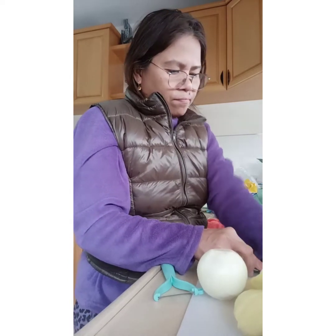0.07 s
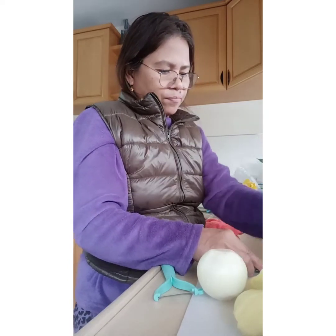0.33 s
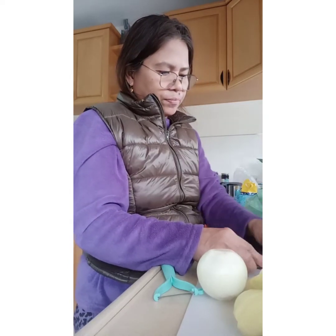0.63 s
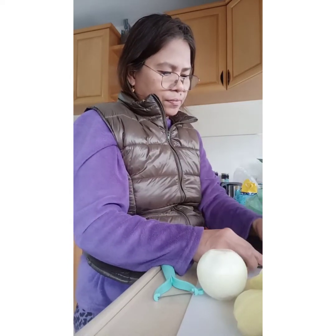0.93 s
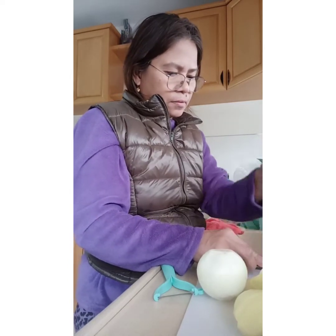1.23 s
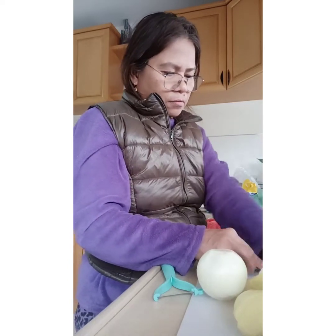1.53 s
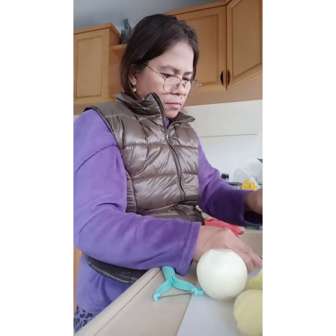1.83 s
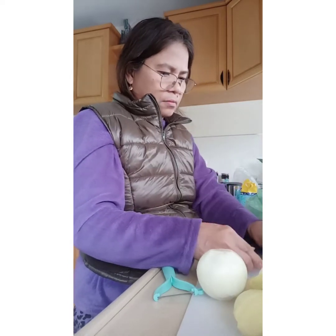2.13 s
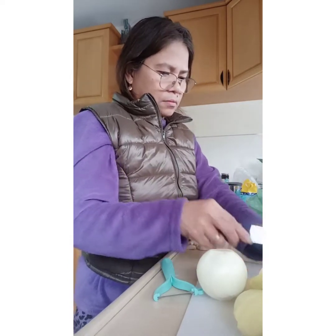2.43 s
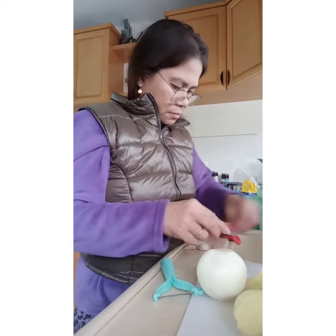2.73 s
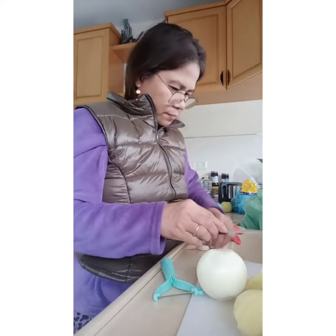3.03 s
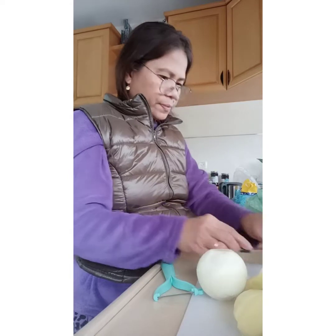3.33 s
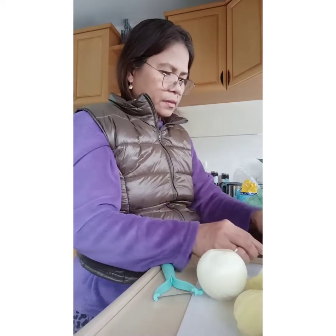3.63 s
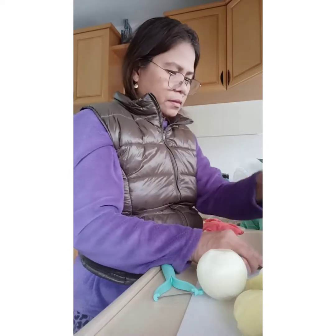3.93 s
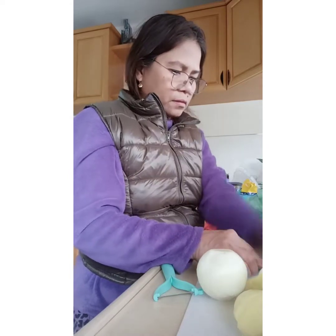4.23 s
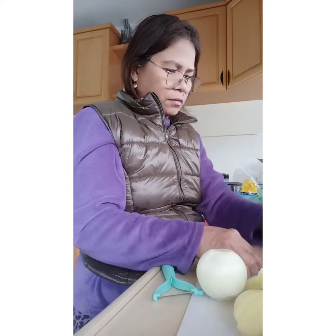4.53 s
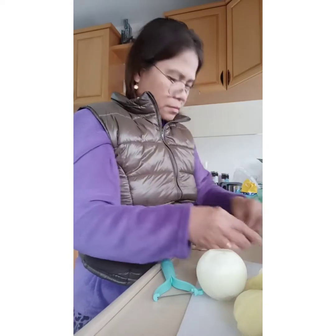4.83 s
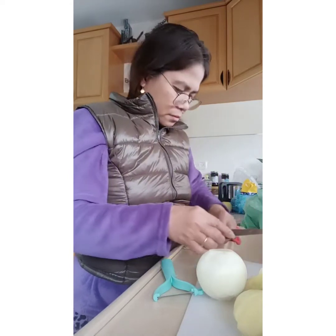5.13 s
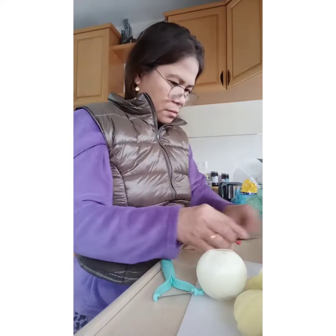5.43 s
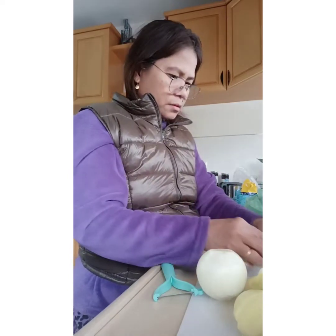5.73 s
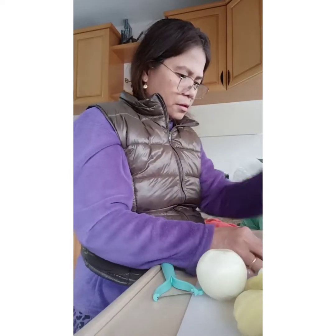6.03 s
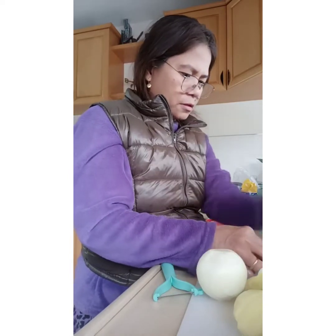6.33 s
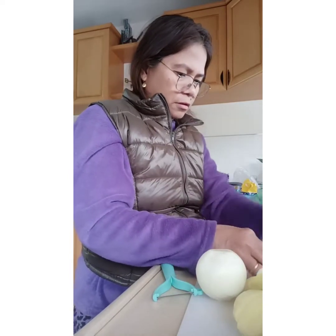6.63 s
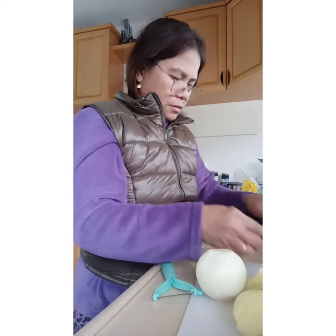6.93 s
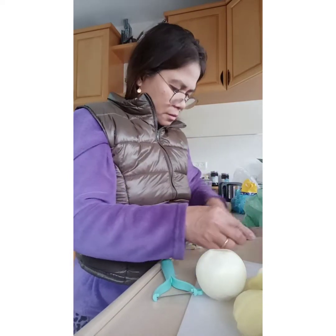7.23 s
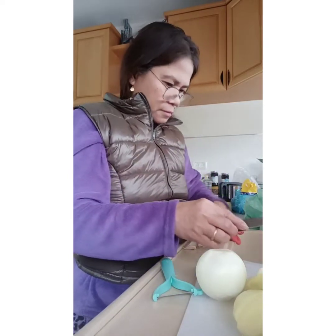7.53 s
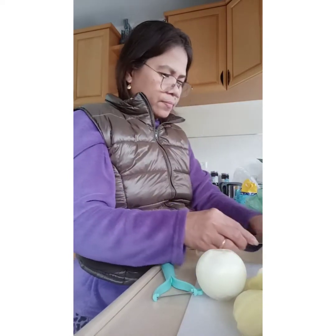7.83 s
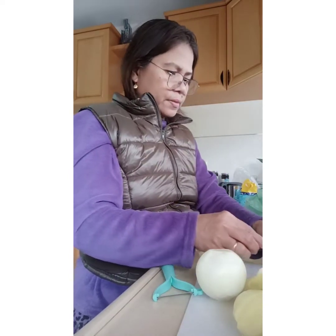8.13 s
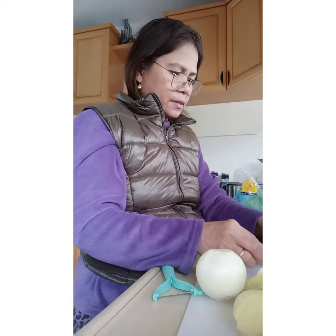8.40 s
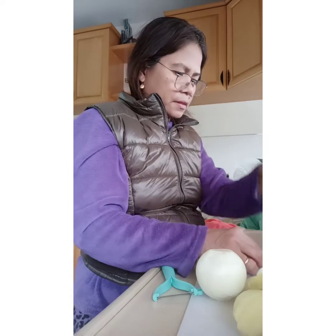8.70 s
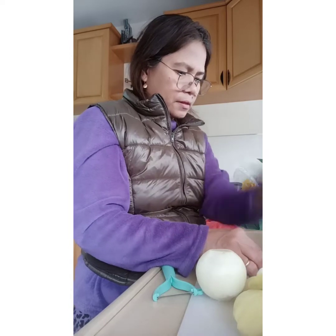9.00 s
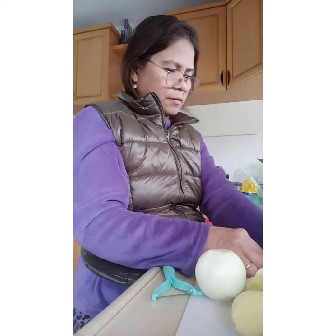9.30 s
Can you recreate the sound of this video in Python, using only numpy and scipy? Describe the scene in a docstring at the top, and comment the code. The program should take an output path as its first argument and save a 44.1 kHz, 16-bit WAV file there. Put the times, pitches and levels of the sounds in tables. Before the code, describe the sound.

In a small, hard-walled kitchen, a fridge and a fan hum faintly while papery onion skin is cut and stripped off near the microphone. Light crinkles come first, then a sharp snap and several rustling pulls. A stronger bout of tearing follows, then a run of small ticks and rips, and a last crack and pull. Occasional muffled bumps on the counter accompany the quiet, close peeling.

```python
"""Peeling papery vegetable skin

Dry, papery skin is cut and pulled off at a kitchen counter, close to a phone. It fails by brittle
fracture: each pull is a swarm of tiny breaks that swells and dies away. Between pulls come short rips,
snapping flakes, light fingering and soft knocks. A small hard room reflects them, and two appliance
motors hum underneath, with steady air noise and a brief low drone."""
import sys
import numpy as np
from scipy import signal
from scipy.fft import rfft, irfft
from scipy.io import wavfile
from scipy.ndimage import uniform_filter1d

SR = 44100
rng = np.random.default_rng(int(sys.argv[2]) if len(sys.argv) > 2 else 0)


def generate_wav(signal):
    """Clip the signal to [-1, 1] and save it as 16-bit WAV at the path in sys.argv[1]."""
    frames = np.transpose(np.atleast_2d(signal))
    scaled = np.clip(frames, -1, 1) * 32767
    pcm = np.round(scaled).astype(np.int16)
    wavfile.write(sys.argv[1], SR, pcm)


N = 421596
T, FREQ = np.arange(N) / SR, np.arange(N // 2 + 1) * SR / N


def pulls(gain_db=-4):
    """Incoherent addition: overlapping pulls sum in power, and the strongest sets the timbre."""
    # strips dragged off: peak_s, level_db, swell_s, fade_s, body_db, treble_db, sheet_hz
    strips = [(0.661, -43, 0.026, 0.037, -19.5, -1.5, 4500), (0.744, -46, 0.038, 0.04, -14, -1.9, 3550),
              (0.991, -48.5, 0.018, 0.021, -22, -4.5, 5350), (1.3, -61.5, 0.024, .03, -20, -1, 5700),
              (1.45, -56.5, 0.018, .02, -13, 0, 6050), (1.52, -59, 0.033, 0.018, -27, -2, 5660),
              (2.148, -46.5, 0.02, 0.031, -16.5, -2.5, 3630), (2.29, -44.5, 0.025, 0.029, -16, -2, 5000),
              (2.41, -46, 0.034, 0.039, -11.5, -3, 5130), (2.515, -52, 0.041, 0.035, -16, -2.5, 4600),
              (4.095, -58.5, 0.033, .012, -17, -4, 4030), (4.195, -53.5, 0.022, 0.017, -17, -2, 5400),
              (4.286, -41, 0.027, 0.032, -20.5, -2, 3950), (4.42, -48, .02, 0.024, -12, -2.3, 5300),
              (4.489, -41, 0.031, 0.025, -16, -1.6, 5670), (4.62, -58, 0.035, 0.032, -22, -2.5, 5540),
              (5.675, -53.5, 0.033, 0.032, -22, -3.5, 4300), (5.838, -38, 0.022, 0.025, -22.5, -1.3, 4500),
              (6.02, -41, 0.033, 0.031, -17.5, -0.5, 4430), (6.135, -40, 0.044, 0.037, -18, -3, 4850),
              (6.18, -40.5, 0.024, 0.033, -16, -3.5, 3880), (6.268, -39, 0.014, 0.0067, -14, -2, 5110),
              (8.715, -45, 0.028, .022, -25, -1, 2820), (8.76, -46, .007, 0.013, -17, -2, 2760),
              (8.835, -40.5, 0.019, 0.023, -14, -2, 4640), (8.99, -54, 0.024, 0.025, -16, -1, 5260)]
    strips, t = np.array(strips), T[::64]
    powers = np.array([undb(db) ** 2 * swell(t - peak_s, swell_s, fade_s)
                       for peak_s, db, swell_s, fade_s in strips[:, :4]])
    total = powers.sum(axis=0)
    body_db, treble_db, sheet_hz = (np.interp(T, t, column @ powers / total) for column in strips.T[4:])
    skin = rustle(per_s=3200, spread_db=6.5, catch_db=1.5, body_db=body_db, treble_db=treble_db,
                  sheet_hz=sheet_hz, ring_db=7)
    return undb(gain_db) * np.sqrt(np.interp(T, t, total)) * skin


def swell(t, swell_s, fade_s):
    """Power envelope of a pull: exponential growth and decay, rounded off at t = 0."""
    from_peak = np.maximum(-t / swell_s, t / fade_s)
    return 1 / np.cosh(np.minimum(from_peak, 20)) ** 2


def rustle(per_s, spread_db, catch_db, body_db, treble_db, sheet_hz, ring_db):
    """Stick-slip excitation: fractures catch and let go, driving the sheet and the vegetable under it."""
    # spectrum of the skin: frequency_hz, density_db
    skin_spectrum = [(880, -42), (1500, 2), (1670, 3.5), (2350, 2.5), (3610, 3.5), (4850, -1.5), (7600, 0),
                     (11000, -9), (15500, -6.5)]
    # spectrum of the vegetable: frequency_hz, density_db
    body_spectrum = [(150, -1), (300, 7), (550, 3.5), (900, 7), (1400, 5.5), (2200, -23.5)]
    swarm = fractures(per_s, spread_db) * undb(catch_db * walk(90))
    treble = undb(np.minimum(treble_db, -0.7))
    colour = undb(across(skin_spectrum)) / np.sqrt(1 + (1900 / (FREQ + 1)) ** 8)
    fine_share = 1 / (1 + (7000 / (FREQ + 1)) ** 10)  # the finest flakes make the treble
    coarse = unit(shape(swarm, colour * np.sqrt(1 - fine_share)))
    # the sheet's pitch slides as it bends: crossfade resonators a third of an octave apart
    pitch_octaves = np.log2(sheet_hz) + 0.39 * walk(44)
    ring = sum(band(coarse, hz, q=3) * np.maximum(1 - 3 * np.abs(pitch_octaves - np.log2(hz)), 0)
               for hz in 2000 * 2 ** (np.arange(7) / 3))
    crinkle = unit(coarse + undb(ring_db) * ring) * np.sqrt(1 - treble ** 2)
    fizz = unit(shape(swarm, colour * np.sqrt(fine_share))) * treble
    rub = unit(shape(swarm, undb(across(body_spectrum)))) * undb(np.minimum(body_db, 0))
    return crinkle + fizz + rub


def fractures(per_s, spread_db, size=N):
    """Poisson process: tiny breaks come at random moments, a few much larger than the rest."""
    breaks = rng.random(size) < per_s / SR
    polarity = rng.choice([-1, 1], size)
    strength = undb(spread_db * np.clip(rng.standard_normal(size), -2, 2))
    return unit(breaks * polarity * strength + 1e-9)


def snaps(crackle_s=0.01, gain_db=-2.5):
    """Brittle fracture: a flake breaks with one impulse, and the crack runs on for a moment."""
    # snapping flakes: start_s, level_db, pitch_hz, q
    breaks = [(0.067, -38.5, 7700, 1), (0.911, -31, 6500, 1.4), (1.109, -39, 7500, .9),
              (1.317, -29.5, 8750, 1.6), (2.2621, -18.5, 2700, 0.7), (2.2783, -21, 5200, 1.6),
              (3.376, -39, 9900, 0.87), (5.365, -43.5, 13000, 0.6), (5.829, -21.5, 5500, 0.55),
              (6.01, -20, 3530, 0.92), (6.0205, -37, 3600, .7), (7.042, -34, 5500, 1.5),
              (7.22, -34, 5870, 2.1), (7.2603, -32.5, 3640, 1.3), (7.3423, -32, 1800, .9),
              (7.4195, -29.5, 14500, 1.6), (7.519, -33, 5740, 0.73), (8.008, -30.5, 6500, 0.41),
              (8.344, -40, 3740, 1.8), (8.406, -39.5, 5400, 0.69), (8.477, -40.5, 6000, 0.95),
              (8.484, -33, 4160, 0.55), (8.6948, -25.5, 3940, 0.77), (8.709, -17, 2390, 1),
              (8.7183, -25, 2900, 0.43)]
    out, t = np.zeros(N), T[:4096]
    for start_s, db, hz, q in breaks:
        thinness = np.log2(hz / 3500)  # thinner flakes crackle more and tick less
        crack = fractures(per_s=5000, spread_db=6.4, size=len(t)) * np.exp(-t / crackle_s)
        crackle = undb(-8.5 + 4.5 * thinness) * crack / np.linalg.norm(crack)
        click = flake(signal.unit_impulse(len(t)) + crackle, hz, q, body_db=-10 - 2 * thinness)
        add(out, start_s, undb(db + gain_db) * click / np.abs(click).max())
    return out


def rips(gain_db=-4.5):
    """Crack propagation: a small tear speeds up, then runs out; amplitude follows its speed."""
    # short tears: start_s, level_db, pitch_hz, rise_s, fall_s
    tears = [(0.415, -55.5, 4500, .008, 0.039), (0.47, -59, 4600, 0.022, .037),
             (0.733, -40, 2500, 0.0059, 0.013), (0.909, -46.5, 6600, 0.0069, 0.017),
             (0.968, -49, 5270, 0.016, 0.013), (1.102, -44, 7000, 0.01, 0.019),
             (1.249, -58, 8000, .005, 0.033), (1.316, -48, 8700, 0.0055, 0.012),
             (1.416, -52.5, 7900, .003, .014), (1.59, -55.5, 7100, 0.0066, 0.0092),
             (1.942, -55, 4070, 0.0033, 0.033), (1.98, -57, 4940, .005, 0.037),
             (2.103, -52, 5500, .003, 0.023), (2.154, -49, 2700, .009, 0.011),
             (2.26, -43, 3000, .004, 0.015), (2.392, -41, 5700, .005, 0.011),
             (2.882, -53, 4740, .006, .034), (3.068, -49, 5260, .009, 0.024),
             (3.274, -60, 7640, .007, 0.0076), (3.986, -66, 3500, 0.0089, 0.057),
             (4.523, -40.5, 5960, .008, 0.013), (4.955, -53, 3380, 0.0054, 0.017),
             (5.068, -60, 5930, 0.013, .034), (5.504, -63.5, 2600, 0.0053, .018),
             (5.593, -54.5, 2700, 0.0054, 0.018), (5.776, -45.5, 4470, .003, 0.01),
             (5.858, -36, 3430, 0.0055, 0.0069), (6.008, -40, 3200, 0.0025, .007),
             (6.72, -50.5, 4730, 0.0098, 0.011), (6.936, -53, 6000, 0.0054, 0.012),
             (7.198, -62, 6040, .018, .01), (7.385, -53, 5000, 0.015, 0.028),
             (7.635, -57.5, 3250, .008, 0.018), (7.714, -49, 3020, 0.0034, 0.017),
             (7.752, -51.5, 4600, 0.0094, 0.013), (7.837, -46.5, 4170, .004, .011),
             (7.868, -51, 3770, 0.0073, 0.01), (7.928, -52, 3800, 0.0046, .038),
             (7.975, -51, 4200, 0.011, 0.031), (8.055, -52, 4530, 0.0072, 0.0089),
             (8.165, -54.5, 5650, .011, 0.075), (8.236, -44, 4000, .006, 0.0086),
             (8.278, -57, 5030, .007, .012), (8.644, -55, 4200, .014, .044),
             (8.707, -33.5, 2330, 0.0034, 0.011), (9.525, -58.5, 6040, 0.0074, .03)]
    out, t = np.zeros(N), T[:8192]
    for start_s, db, hz, rise_s, fall_s in tears:
        speed = np.minimum(t / rise_s, np.exp(-(t - rise_s) / fall_s))
        force = fractures(per_s=7000, spread_db=4.4, size=len(t))
        tear = flake(force, hz, q=0.62, body_db=-14, broad_db=-13.5, fizz_db=-11)
        add(out, start_s, undb(db + gain_db) * speed * unit(tear))
    return out


def flake(force, hz, q, body_db, broad_db=-15, fizz_db=-17):
    """Forced vibration: a scrap of skin rings and fizzes; the vegetable adds a dull tick."""
    edge = signal.sosfilt(signal.butter(3, 2100, "high", fs=SR, output="sos"), force)
    ring = band(band(edge, hz, q), hz, q)
    fizz = band(edge, 14300, q=6.1)
    body = band(band(force, 1350, q=0.72), 1350, q=0.72)
    return ring + undb(broad_db) * edge + undb(fizz_db) * fizz + undb(body_db) * body


def fingering(gain_db=-8, rest_db=-85.5, ramp_s=0.11):
    """Friction noise: light touches set off sparser fractures, a thin and grainy rustle."""
    # spells of touching: start_s, end_s, level_db
    spells = [(0, 0.153, -70.5), (0.164, .42, -76), (0.398, 1.6, -69.5), (1.947, 2.9, -77),
              (2.898, 3.43, -72), (4.03, 4.793, -70), (4.97, 5.556, -78), (5.54, 6.44, -70),
              (6.47, 6.762, -66), (6.87, 7.206, -63.5), (7.194, 8.577, -63), (8.536, 9.19, -69),
              (9.2, 9.57, -80)]
    stir = undb(rest_db) + sum(undb(db) * ((T >= start) & (T < end)) for start, end, db in spells)
    stir = uniform_filter1d(stir, int(ramp_s * SR))
    skin = rustle(per_s=900, spread_db=3.5, catch_db=3.5, body_db=-11.5, treble_db=-2.5,
                  sheet_hz=4460, ring_db=5.5)
    return undb(gain_db) * stir * skin


def knocks(q=2.4, contact_s=0.013):
    """Damped resonance: a padded touch makes the counter ring briefly and dully."""
    # touches on the counter: start_s, level_db, pitch_hz
    touches = [(2.262, -50, 580), (2.278, -48.5, 360), (2.523, -53.5, 754), (4.316, -48.5, 900),
               (4.49, -51.5, 490), (4.535, -51.5, 560), (6.168, -48, 596), (6.27, -47.5, 480),
               (6.726, -54, 990), (6.735, -50.5, 298), (8.861, -52, 466)]
    out, t = np.zeros(N), T[:4096]
    for start_s, db, hz in touches:
        force = rng.standard_normal(len(t)) * np.exp(-t / contact_s)
        thud = band(band(force, hz, q), hz, q=0.26)
        add(out, start_s, undb(db) * thud / np.abs(thud).max())
    return out


def peeling(gain_db=-1):
    """Source and filter: all the sounds of peeling are coloured by the same few resonances."""
    # common resonances: pitch_hz, q, level_db
    resonances = [(2360, 4.7, -5), (3780, 7.9, -12.5), (5860, 14, -4), (7840, 11, -5.5)]
    sources = pulls() + fingering() + snaps() + rips() + knocks()
    return undb(gain_db) * (sources + sum(undb(db) * band(sources, hz, q) for hz, q, db in resonances))


def kitchen(source, near_t60_s=0.066, near_db=0.5, room_t60_s=0.35, room_db=-3.5, hop=1400):
    """Reverberation: direct sound, early reflections and the room's short tail, as mid and side."""
    t = T[:SR // 5]
    mid_side = np.array([source, 0.43 * np.roll(source, 4)])
    onset = 1 - np.exp(-t / 0.0008)
    near, room = (unit(onset * undb(-60 * t / t60_s)) for t60_s in (near_t60_s, room_t60_s))
    decay = np.hypot(undb(near_db) * near, undb(room_db) * room) / np.sqrt(len(t))
    window = signal.windows.cosine(2 * hop)
    for i in range(0, N, hop):  # the tear moves, and every spot has its own pattern of reflections
        segment = source[i:i + 2 * hop] * window[:N - i]
        response = decay * rng.standard_normal((2, len(t)))
        echoes = signal.fftconvolve(segment[None], response, axes=1)
        for track, echo in zip(mid_side, echoes):
            add(track, i / SR, echo)
    return mid_side


def motors():
    """Rotating machinery: a fridge and a fan each hum at orders of their own shaft rate."""
    # fridge hum: shaft_order, level_db
    fridge = [(.5, -75.5), (1, -76), (2, -75.5), (5, -74), (6, -69), (7, -64), (9, -73.5), (10, -82.5)]
    # fan hum: shaft_order, level_db
    fan = [(2, -79), (4, -68.5), (5, -75.5), (7, -78.5), (10, -73), (11, -82)]
    return hum(fridge, shaft_hz=49.33) + hum(fan, shaft_hz=36.5)


def hum(partials, shaft_hz, drift=0.00093, waver_db=2.06):
    """Periodic forcing: partials locked to a slightly drifting shaft, each wavering in level."""
    angle = 2 * np.pi * np.cumsum(shaft_hz * (1 + drift * walk(2.04))) / SR
    out = np.zeros(N)
    for order, db in partials:
        amplitude = np.sqrt(2) * undb(db + waver_db * walk(3))
        out += amplitude * np.sin(order * angle + 2 * np.pi * rng.random())
    return out


def air(level_db=-62.5):
    """Ambient noise: dull, steady air, uncorrelated between mid and side."""
    # spectrum of the kitchen air: frequency_hz, density_db
    spectrum = [(12, 11), (30, -8), (60, 1), (125, -6.5), (165, 3), (200, -0.5), (270, -3), (350, -1.5),
                (480, -7), (700, -14), (1500, -22.5), (4000, -25), (9000, -32.5), (15500, -33.5)]
    colour = undb(across(spectrum))
    return np.array([undb(level_db + 0.09 * walk(4)) * unit(shape(rng.standard_normal(N), colour))
                     for _ in range(2)])


def drone(hz=78, q=9):
    """Narrow-band noise: a faint low rumble that swells once."""
    # envelope of the rumble: time_s, level_db
    envelope = [(8.4, -90), (8.7, -68.5), (9.15, -67.5), (9.4, -80)]
    time_s, level_db = np.transpose(envelope)
    rumble = unit(band(band(rng.standard_normal(N), hz, q), hz, q))
    return rumble * undb(np.interp(T, time_s, level_db))


def ports(mid, side):
    """Mid-side stereo: balance and likeness of two microphone ports vary with frequency."""
    # port response: frequency_hz, left_minus_right_db, likeness (0-1)
    response = [(49.6, 1, 0.6), (150, -1, 0.84), (383, -3, 0.9), (740, -4, 0.07), (2950, -4.5, 0),
                (4900, -6, 0), (6200, -15, 0), (7070, 3, 0.76), (7700, 2.5, 0.5), (9300, 3.5, 1),
                (11500, -6, 1), (13400, -3, 0), (15200, -36, 0.2)]
    balance_db = across(response)
    likeness = np.clip(across(response, column=2), 0, 0.99)
    side = shape(side, np.sqrt((1 - likeness) / (1 + likeness)))
    left, right = undb(balance_db / 2), undb(-balance_db / 2)
    rms_gain = np.hypot(left, right) / np.sqrt(2)
    return np.array([shape(mid + side, left / rms_gain), shape(mid - side, right / rms_gain)])


def undb(db):
    """Decibels to amplitude ratio."""
    return 10 ** (np.asarray(db) / 20)


def unit(x):
    """Normalisation to rms 1."""
    return x / np.sqrt(np.mean(x ** 2))


def across(points, column=1):
    """Linear interpolation of a table column over log frequency."""
    points = np.array(points)
    return np.interp(np.log(FREQ + 1), np.log(points[:, 0]), points[:, column])


def shape(x, gain):
    """Zero-phase filtering by a gain for each frequency."""
    return irfft(rfft(x) * gain, N)


def band(x, hz, q):
    """A causal second-order resonance."""
    hz = min(hz, 0.42 * SR)
    return signal.lfilter(*signal.iirpeak(hz, max(q, 2.5 * hz / SR), fs=SR), x)


def walk(rate_hz):
    """Smooth random modulation with a spread near 1."""
    size = int(SR / rate_hz)
    steps = np.repeat(rng.standard_normal(N // size + 1), size)
    return 1.084 * uniform_filter1d(steps, size)[:N]


def add(track, start_s, sound):
    """Superposition of a short sound on a track."""
    i = int(start_s * SR)
    track[i:i + len(sound)] += sound[:N - i]


def scene():
    """Superposition at the microphones: peeling in the room, over air, hum and drone."""
    mid, side = kitchen(peeling()) + air()
    return ports(mid + motors() + drone(), side)


def record(dry, cutoff_hz=15850):
    """Band limiting: the phone's steep low-pass filter cuts the top."""
    return signal.sosfilt(signal.ellip(10, 0.2, 60, cutoff_hz, fs=SR, output="sos"), dry)


dry = scene()
out = record(dry)
generate_wav(out)
```